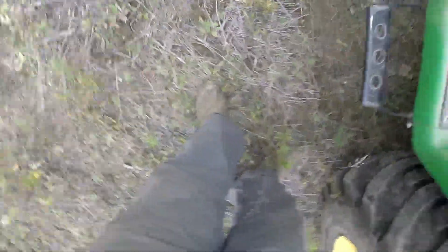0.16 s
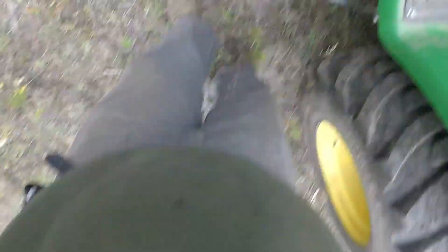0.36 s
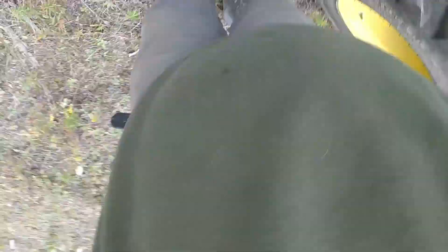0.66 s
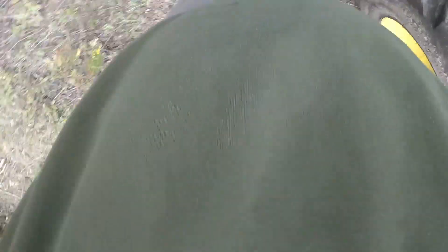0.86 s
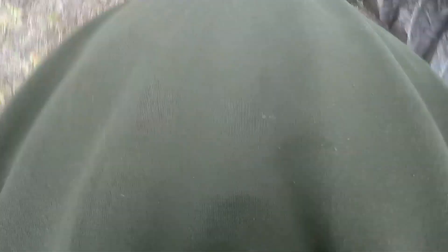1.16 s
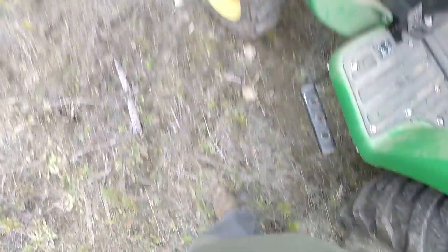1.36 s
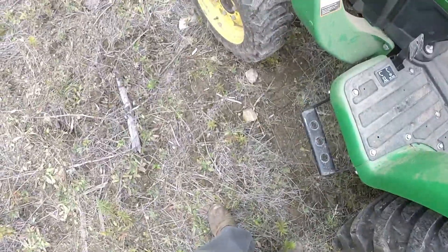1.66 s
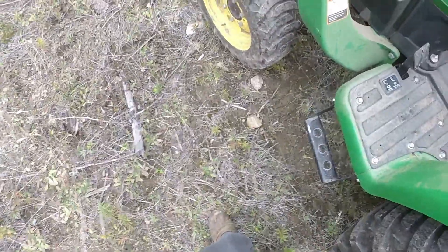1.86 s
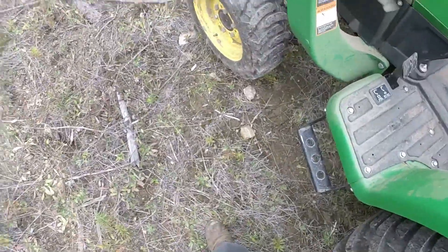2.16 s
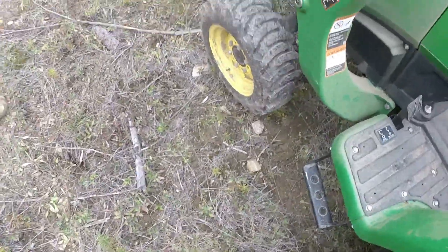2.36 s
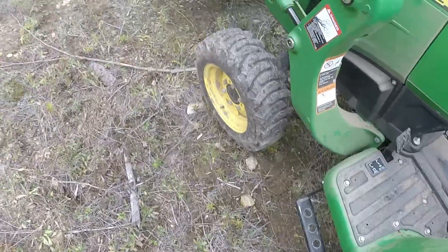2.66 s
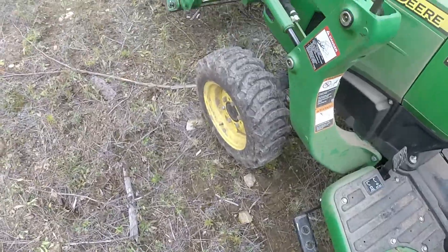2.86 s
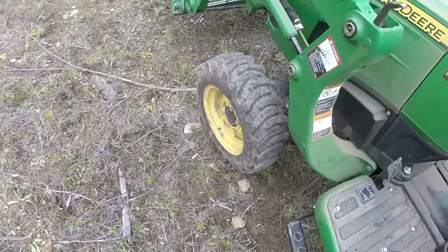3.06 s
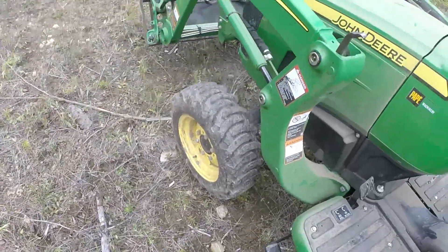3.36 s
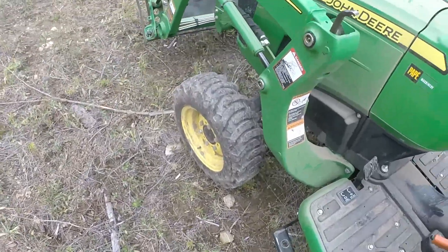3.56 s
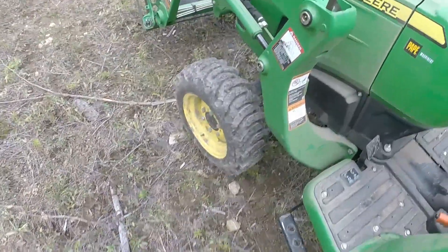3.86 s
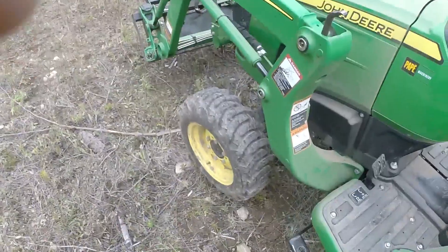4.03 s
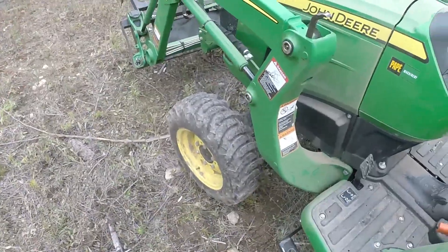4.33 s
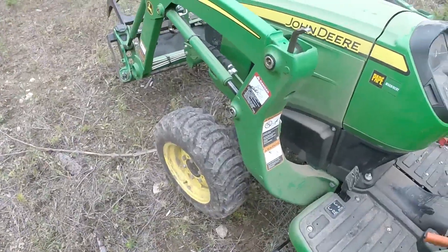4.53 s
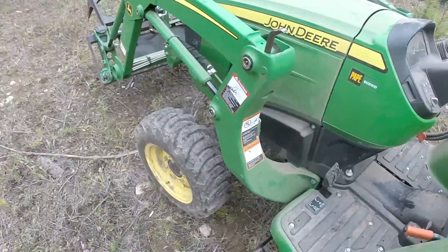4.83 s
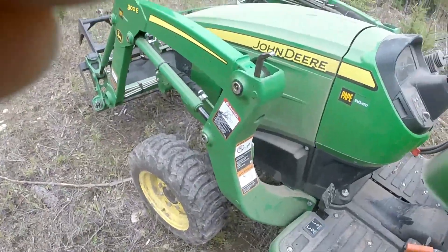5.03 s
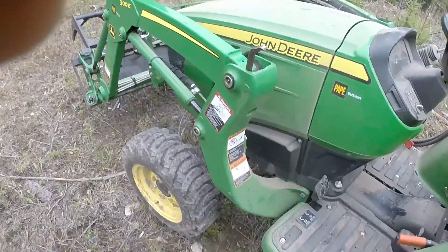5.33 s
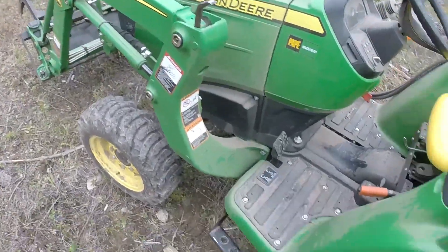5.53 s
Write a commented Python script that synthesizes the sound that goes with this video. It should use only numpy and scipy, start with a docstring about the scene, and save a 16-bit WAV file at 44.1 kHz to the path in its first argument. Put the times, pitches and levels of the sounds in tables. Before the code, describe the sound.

Soft fabric rustle and small taps sit over faint open air until something hits the camera's plastic body with one hard crack. A lull follows with only a few ticks. Then comes the main sound: very close, uneven scraping of fingers on the case, with sticky pops, a short creak and dull puffs of air, closing on a second knock. Everything is dry, with no echo.

```python
"""In a dry clearing, a small camera is carried beside a parked tractor. The outdoor air is quiet.
Clothes rustle as their fibres brush, and the shifting grip puffs air into the microphone.
Something knocks hard on the plastic case, making it ring and overloading the microphone.
Then fingers drag over the case: the skin sticks and slips, so it rasps, creaks and pops."""
import sys
import numpy as np
from scipy import signal
from scipy.fft import rfft, irfft
from scipy.io import wavfile
from scipy.ndimage import uniform_filter1d

SR = 44100
rng = np.random.default_rng(int(sys.argv[2]) if len(sys.argv) > 2 else 0)


def log_audio(samples):
    """Write samples as a 16-bit WAV file to the path given in sys.argv[1]."""
    # one column per channel
    frames = np.atleast_2d(samples).T
    # limit to full scale, then quantise
    limited = np.clip(frames, -1, 1)
    pcm = np.round(limited * 32767).astype(np.int16)
    wavfile.write(sys.argv[1], SR, pcm)


N = 250929
TIME = np.arange(N) / SR


def undb(db):
    """Turn decibels into a number to multiply a sound by."""
    return 10 ** (np.asarray(db) / 20)


def unit(x):
    """Scale a sound to an average strength (rms) of 1."""
    return x / np.sqrt(np.mean(x ** 2))


def peaked(x, db):
    """Scale a sound so that its highest peak is at db."""
    return x * undb(db) / np.abs(x).max()


def band(x, lo_hz, hi_hz, order=2):
    """Keep the part of a sound between two pitches."""
    return signal.sosfilt(signal.butter(order, [lo_hz, hi_hz], "band", fs=SR, output="sos"), x)


def colour(x, points):
    """Shape a sound's tone with (pitch_hz, level_db) points; the result has strength 1."""
    hz, db = np.transpose(points)
    bins_hz = np.maximum(np.arange(N // 2 + 1) * SR / N, 1)
    gain = undb(np.interp(np.log(bins_hz), np.log(hz), db))
    return unit(irfft(rfft(x) * gain, N))


def drift(rate_hz):
    """A smooth random wobble of strength 1."""
    step = int(SR / rate_hz)
    stairs = np.repeat(rng.standard_normal(N // step + 1), step)[:N]
    return unit(uniform_filter1d(stairs, step))


def grains(rate_hz, spread_db):
    """Tiny touches of uneven strength at random moments."""
    hits = (rng.random(N) < rate_hz / SR) * rng.standard_normal(N)
    return unit(hits * undb(spread_db * np.minimum(rng.exponential(size=N), 4)))


def add(out, start_s, sound):
    """Mix a short sound in at start_s."""
    i = int(start_s * SR)
    out[i:i + len(sound)] += sound[:N - i]


def movement(time_s, level_db, fade_s=0.0027):
    """How loud one movement is over time, silent before and after."""
    gain = undb(np.interp(TIME, time_s, level_db, left=-np.inf, right=-np.inf))
    return np.abs(uniform_filter1d(gain, int(fade_s * SR)))


# The tone of the outdoor air: pitch_hz, level_db
AIR_TONE = [(15, -41), (25, -2.5), (140, -5), (169, -6), (378, -4), (631, -10), (782, -5), (919, -11.5),
            (1200, -9.5), (2010, -14.5), (2850, -13.5), (3530, -20), (13500, -38), (15500, -47)]
# Swells of a faint, hollow rush: peak_s, pitch_hz, level_db
RUSH_SWELLS = [(1.078, 280, -48), (1.95, 386, -45.5), (3.55, 385, -48), (5.5, 382, -52)]
def outdoors(air_db=-48.5, breeze_db=-60, rush_width_hz=60, swell_s=0.25):
    """Steady air, a light breeze on the microphone and a hollow rush far off."""
    air = colour(rng.standard_normal(N), AIR_TONE) * undb(air_db + 0.27 * drift(15))
    breeze = unit(band(rng.standard_normal(N), 23, 65)) * undb(breeze_db + 4.6 * drift(21))
    peak_s, pitch_hz, level_db = np.transpose(RUSH_SWELLS)
    # slow noise blurs a tone into a rush
    noise = band(rng.standard_normal((2, N)), 0.87, 260)
    blur = unit(signal.sosfilt(signal.butter(1, rush_width_hz, fs=SR, output="sos"), noise))
    phase = 2 * np.pi * np.cumsum(np.interp(TIME, peak_s, pitch_hz)) / SR
    rush = blur[0] * np.cos(phase) + blur[1] * np.sin(phase)
    swells = np.exp(-((TIME[:, None] - peak_s) / swell_s) ** 2) @ undb(level_db)
    return air + breeze + rush * swells


# The tone of rustling cloth: pitch_hz, level_db
CLOTH_TONE = [(180, -19), (300, -14), (669, 4), (763, -17), (855, 8), (1230, -6.5), (1540, -1), (2280, -11),
              (2870, -6), (3440, -24.5), (7790, -36), (8600, -45), (9800, -27), (15000, -78)]
# Clothes brushing, one list of points for each movement: time_s, level_db
CLOTH_MOVES = [
    [(0.0, -52.5), (0.172, -43), (0.479, -44.5), (0.511, -38), (0.567, -60), (0.686, -51), (0.758, -61)],
    [(1.261, -52.5), (1.347, -39.5), (1.373, -47.5), (1.449, -62)],
    [(3.275, -54), (3.297, -46), (3.336, -47.5), (3.44, -44), (3.52, -50)],
]
def clothes(boost_db=1, sleeve_start_s=2.255, sleeve_end_s=2.56, fade_s=0.065, sleeve_db=-57.5):
    """Fibres flick past each other in uneven bursts; a sleeve slides once with a finer hiss."""
    rustle = colour(grains(rate_hz=1800, spread_db=1) * undb(2.5 * drift(70.14)), CLOTH_TONE)
    sleeve = unit(band(grains(rate_hz=9800, spread_db=-10), 2500, 6800, order=1))
    moving = sum(movement(*np.transpose(move)) for move in CLOTH_MOVES)
    sliding = np.clip(np.minimum(TIME - sleeve_start_s, sleeve_end_s - TIME) / fade_s + .5, 0, 1)
    return rustle * undb(boost_db) * moving + sleeve * sliding * undb(sleeve_db)


# Puffs of air from the shifting grip: start_s, peak_db, length_s
AIR_PUFFS = [(1.223, -15, 0.006), (3.395, -25.5, 0.029), (3.655, -26, 0.016), (3.738, -22.5, .022),
             (3.84, -29, 0.033), (3.915, -16, 0.012), (4.025, -30, 0.029), (4.912, -10.5, 0.029),
             (5.403, -22.5, 0.0081)]
def thumps(pitch_hz=62, flutter_db=-6):
    """The grip pushes air into the microphone hole: a low thump with a flutter on top."""
    out, t = np.zeros(N), TIME[:SR // 5]
    for start_s, peak_db, length_s in AIR_PUFFS:
        rise = t / (length_s / 4)
        swing = np.sin(2 * np.pi * pitch_hz * np.exp(0.18 * rng.standard_normal()) * t)
        flutter = undb(flutter_db) * unit(band(rng.standard_normal(len(t)), 46, 293))
        add(out, start_s, peaked((swing + flutter) * rise * np.exp(-rise), peak_db))
    return out


# The notes the case rings with: pitch_hz, level_db, ring_s (time to fade by 60 dB)
CASE_NOTES = [(547, -8.5, 0.025), (901, -2.5, 0.029), (1120, -1, 0.028), (1480, 2.5, 0.0072),
              (1602, 5.5, 0.018), (1866, -9.5, 0.034), (2490, -0.5, 0.011), (2766, 5, 0.013),
              (3330, -8.5, 0.035), (3730, -6, 0.024), (4350, -38, 0.011), (4980, -8, 0.0054),
              (6230, -13, 0.01), (10900, -14, .012)]
# Knocks and ticks on the case, with peak levels before the boosts: start_s, body_db, crack_db
CASE_KNOCKS = [(0.125, -31, -39), (0.326, -19, -33), (0.424, -26.5, -43), (0.689, -27, -28.5),
               (1.221, 1, 3), (1.234, 1, -3), (1.331, -31, -23.5), (1.346, -24, -29), (1.392, -37, -31),
               (2.274, -48, -30.5), (2.314, -39, -35.5), (2.507, -30.5, -34.5), (3.236, -30.5, -48),
               (3.296, -33, -32.5), (5.451, -6, -2)]
def knocks(contact_s=0.0022, chatter=0.34, split_hz=2100, body_boost_db=1, crack_boost_db=2):
    """A hard hit chatters briefly and rings the case: low notes give body, high notes a crack."""
    out, t = np.zeros(N), TIME[:SR // 12]
    for start_s, body_db, crack_db in CASE_KNOCKS:
        push = chatter * rng.standard_normal(len(t)) * np.exp(-t / contact_s)
        push[0] += 1
        push = band(push, 430, 4300, order=1)  # the hit is slightly cushioned
        low, high = np.zeros((2, len(t)))
        for pitch_hz, level_db, ring_s in CASE_NOTES:
            hz = pitch_hz * (1 + rng.standard_normal() / 200)
            ring = undb(level_db - 60 * t / ring_s) * np.sin(2 * np.pi * hz * t)
            low += ring * (pitch_hz < split_hz)
            high += ring * (pitch_hz >= split_hz)
        body, crack = (signal.fftconvolve(push, part)[:len(t)] for part in (low, high))
        add(out, start_s, peaked(body, body_db + body_boost_db))
        add(out, start_s, peaked(crack, crack_db + crack_boost_db))
    return out


def pop(start_hz, end_hz=230, glide_s=0.00196, rise_s=0.00031, tail=0.062, tail_s=0.006):
    """Skin snaps free with a tiny pop that falls in pitch as the fingertip relaxes."""
    t = TIME[:SR // 25]
    glide_hz = end_hz + (start_hz - end_hz) * np.exp(-t / glide_s)
    pitch_hz = glide_hz * np.exp(rng.standard_normal() / 10)
    loudness = t / rise_s * np.exp(1 - t / rise_s) + tail * np.exp(-t / tail_s)
    return -np.sin(2 * np.pi * np.cumsum(pitch_hz) / SR) * loudness


def creak(start_s=4.985, end_s=5.095, first_db=-19, last_db=-11, count=9,
          pop_hz=850, jitter_s=0.00162, spread_db=2):
    """A slow, firm finger creeps on in a run of small slips that grow stronger."""
    out = np.zeros(N)
    for time_s, peak_db in np.linspace((start_s, first_db), (end_s, last_db), count):
        shift, size = rng.standard_normal(2)
        add(out, time_s + jitter_s * shift, peaked(pop(pop_hz), peak_db + spread_db * size))
    return out


# Skin letting go of the case, with peak levels before the boost and cut: start_s, pop_db, crack_db
FINGER_SLIPS = [(3.693, -23.5, -20), (3.717, -7.5, -17), (3.769, -26, -9.5), (3.814, -12, -23),
                (3.843, -5, -10), (3.858, -18, -4), (3.887, -13, -20), (3.921, -5, -17), (4.023, -11, -14),
                (4.168, -10, -25), (4.182, -6, -12), (4.582, -10.5, -20), (4.592, -9.5, -12),
                (4.607, -11.5, -8), (4.631, -7.5, -3.5), (4.675, -19, -33), (4.858, -38.5, -20),
                (4.895, -19, -9.5), (5.128, -11.5, -33), (5.147, -9.5, -27), (5.154, -8, -27),
                (5.174, -10, -13.5), (5.199, 0.5, 2.5), (5.226, -2.5, -27), (5.365, -16.5, -20)]
def slips(light_hz=1350, firm_hz=920, crack_s=0.0031, fizz_db=-21, pop_boost_db=1.5, crack_cut_db=3):
    """Each slip pops the skin and draws a dry crack from the case; pops deepen as the grip tightens."""
    out, t = np.zeros(N), TIME[:SR // 25]
    pitches_hz = np.geomspace(light_hz, firm_hz, len(FINGER_SLIPS))
    for (start_s, pop_db, crack_db), pitch_hz in zip(FINGER_SLIPS, pitches_hz):
        snap = rng.standard_normal(len(t)) * np.exp(-t / crack_s)
        crack = band(snap, 1400, 3460) + undb(fizz_db) * band(snap, 8100, 13400)
        add(out, start_s, peaked(pop(pitch_hz), pop_db + pop_boost_db))
        add(out, start_s, peaked(crack, crack_db - crack_cut_db))
    return out


# The tone of rubbing as the case carries it to the microphone: pitch_hz, level_db
RUB_TONE = [(1000, -6), (1300, -3.5), (1600, -4.5), (2100, -13), (2750, 3), (3300, -9.5), (4200, -7.5),
            (5200, -25), (6450, -13.5), (7450, -14.5), (8400, -27), (10000, -25.5), (13500, -30),
            (15500, -42)]
# Finger drags, one list of points each: time_s, rasp_db, hollow_db (ring compared with the rasp)
FINGER_DRAGS = [
    [(3.35, -48, 2), (3.384, -36.5, -4), (3.404, -24.5, 5.5), (3.414, -43, 8.5)],
    [(3.66, -45.5, -1), (3.71, -39, -8), (3.72, -35, 16), (3.732, -20, -11.5), (3.747, -20.5, -5),
     (3.787, -39, -10), (3.83, -31.5, -1)],
    [(3.83, -39, 0), (3.849, -19, -10), (3.903, -27.5, -4.5), (3.923, -19, -3), (3.953, -25, -13),
     (3.985, -15.5, 1), (4.015, -33.5, -3)],
    [(4.015, -33, -8), (4.025, -24, -2), (4.089, -24, -13.5), (4.153, -17, -6), (4.184, -15, 3),
     (4.21, -13.5, -7.5)],
    [(4.21, -19, -9), (4.234, -14, -10), (4.246, -18.5, -8.5), (4.27, -10, -8.5), (4.304, -13, -14),
     (4.345, -24.5, -1)],
    [(4.345, -20.5, -4.5), (4.412, -18, -12), (4.468, -27.5, 7.5), (4.55, -22, -7.5), (4.568, -31, -9),
     (4.595, -35, 0)],
    [(4.595, -31, 1), (4.616, -35.5, 5), (4.659, -20.5, -14.5), (4.68, -38, 2)],
    [(4.68, -39.5, 6), (4.727, -30.5, 6.5), (4.743, -21.5, -6), (4.777, -26, 7), (4.791, -22.5, -3.5),
     (4.85, -40.5, -6)],
    [(4.85, -37.5, -8), (4.883, -37.5, -7), (4.917, -16.5, 1.5), (4.945, -38.5, 7)],
    [(4.945, -39, -1), (4.969, -23.5, -3.5), (5.08, -30, -9), (5.114, -36.5, 5), (5.2, -35.5, -1),
     (5.245, -35.5, 3)],
    [(5.37, -36.5, -1), (5.412, -23, -13), (5.432, -24, -13), (5.454, -20, 4.5), (5.485, -43, -15)],
    [(5.485, -45, -7), (5.515, -23.5, -11.5), (5.555, -54, -9)],
]
# How dry the skin is in each drag (drier skin hisses more): dryness_db
SKIN_DRYNESS = [-22, -20.5, -12, -18, -14, -15, -12.5, -7.5, -9, -19, -14.5, -19]
def rubbing(hollow_hz=910, half_width_hz=115, dulling=0.53, murmur_db=-23, rumble_db=-24):
    """Skin ridges catch on the case thousands of times a second while the pressure shakes."""
    rasp_gain, hollow_gain, hiss_gain, edge_gain = np.zeros((4, N))
    for drag, dryness_db in zip(FINGER_DRAGS, SKIN_DRYNESS):
        time_s, rasp_db, hollow_db = np.transpose(drag)
        # a flat finger closes the hollow of the case and rubs duller
        bright_db = dryness_db - dulling * hollow_db
        rasp_gain += movement(time_s, rasp_db)
        hollow_gain += movement(time_s, rasp_db + hollow_db)
        hiss_gain += movement(time_s, rasp_db + bright_db + 1)
        # dry, fast strokes bring out the sharp upper edge of the rasp
        edge_gain += movement(time_s, rasp_db + 0.4 * bright_db + 6)
    catches = grains(rate_hz=6000, spread_db=1.48) * undb(1.69 * drift(160))
    scrape = colour(catches, RUB_TONE)
    # the moving finger muffles now one range of pitches, now another
    borders_hz = [1100, 2100, 3300, 5200, 8400, 17000]
    low, middle, edge, high, top = (band(scrape, lo, hi, order=3) * undb(1.6 * drift(30))
                                    for lo, hi in zip(borders_hz, borders_hz[1:]))
    rasp = ((low + middle) * rasp_gain + edge * edge_gain) / np.std(low + middle + edge)
    hiss = unit(high + top) * hiss_gain
    # the hollow rings at one pitch; the soft fingertip adds a dull murmur below it
    ring = band(catches, hollow_hz - half_width_hz, hollow_hz + half_width_hz, order=1)
    hollow = unit(band(ring, 608, 1066)) * hollow_gain
    murmur = unit(band(catches, 31, 430)) * rasp_gain * undb(murmur_db)
    # the hand rocks the case, which rumbles unevenly
    rumble = unit(band(rng.standard_normal(N), 25, 70)) * rasp_gain * undb(rumble_db + 4 * drift(20))
    return rasp + hiss + hollow + murmur + rumble


def scene():
    """Everything reaches one microphone, with no echo in the open."""
    fingers = rubbing() + slips() + creak()
    return (fingers + knocks() + thumps() + clothes() + outdoors())[None]


def record(dry, dip_db=-10, recover_s=0.35, lag_s=0.018, limit_db=-1, top_hz=15700):
    """Very loud peaks clip and turn the treble down for a while; the highest pitches are cut off."""
    level_db = 20 * np.log10(np.abs(dry[0]) + 1e-9)
    overload = np.clip(1 - level_db / limit_db, 1e-9, 1)
    # each overload lingers and fades slowly
    fade = TIME / recover_s
    held = np.exp(np.maximum.accumulate(np.log(overload) + fade) - fade)
    dip = np.interp(TIME - lag_s, TIME, uniform_filter1d(held, SR // 100))
    treble = signal.sosfiltfilt(signal.butter(1, 2000, "high", fs=SR, output="sos"), dry)
    clipped = np.clip(dry + treble * (undb(dip_db * dip) - 1), -1, 1)
    return signal.sosfilt(signal.ellip(8, .2, 70, top_hz, fs=SR, output="sos"), clipped)


dry = scene()
out = record(dry)
log_audio(out)
```